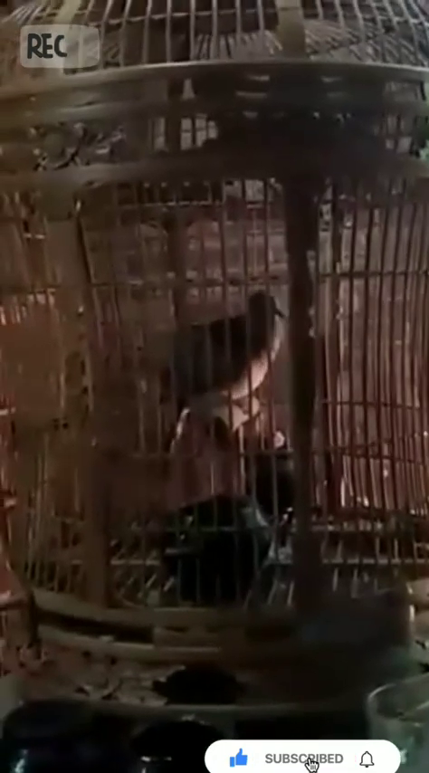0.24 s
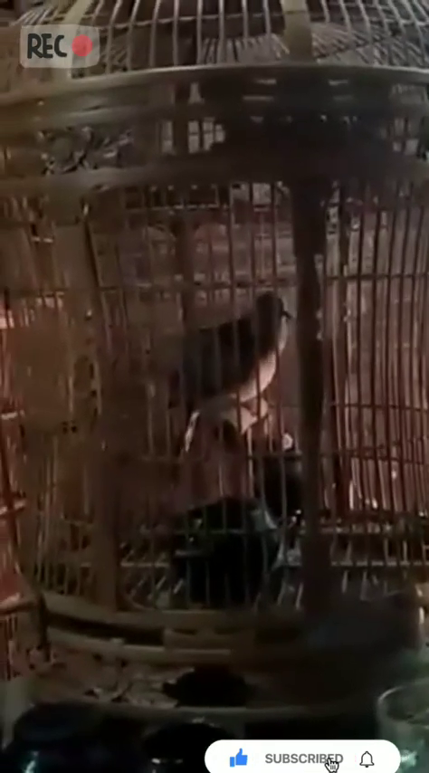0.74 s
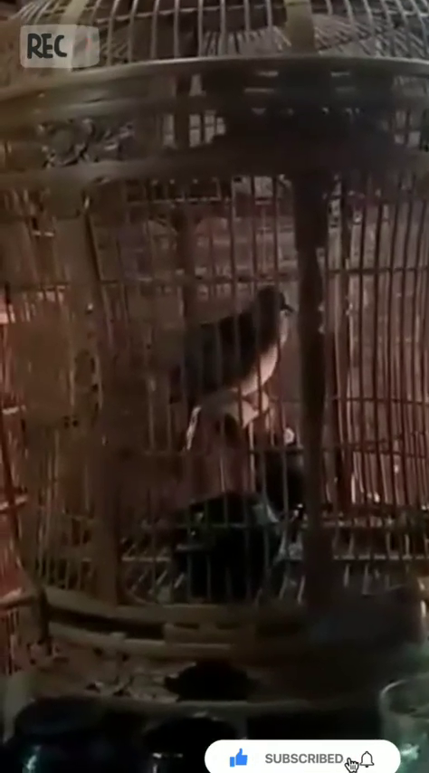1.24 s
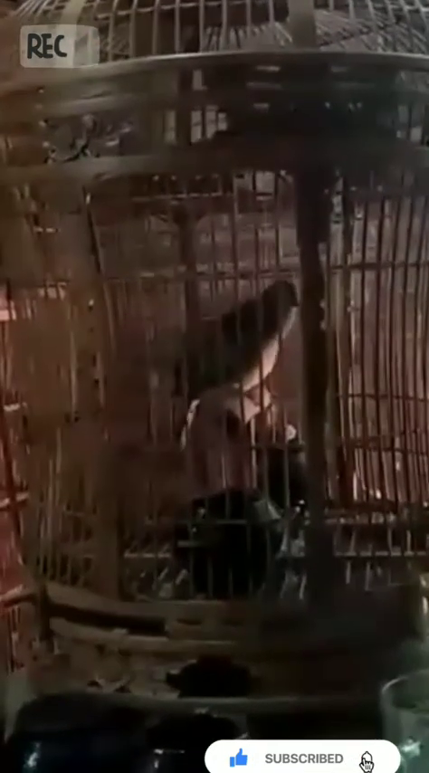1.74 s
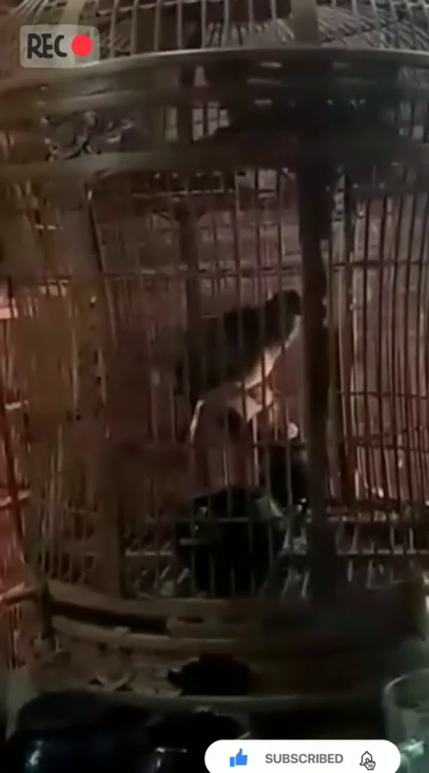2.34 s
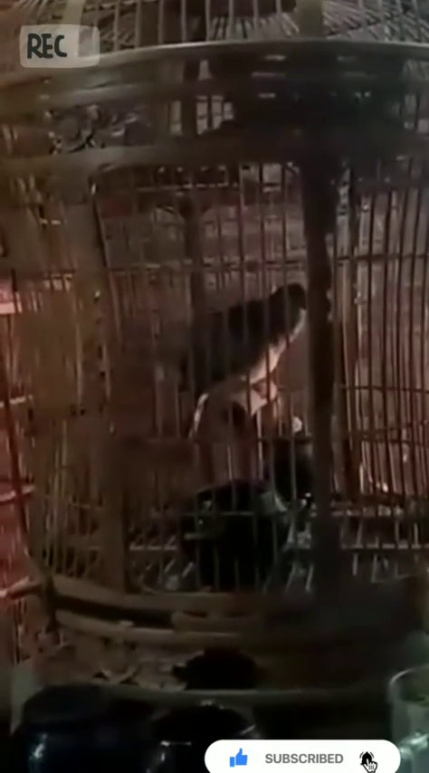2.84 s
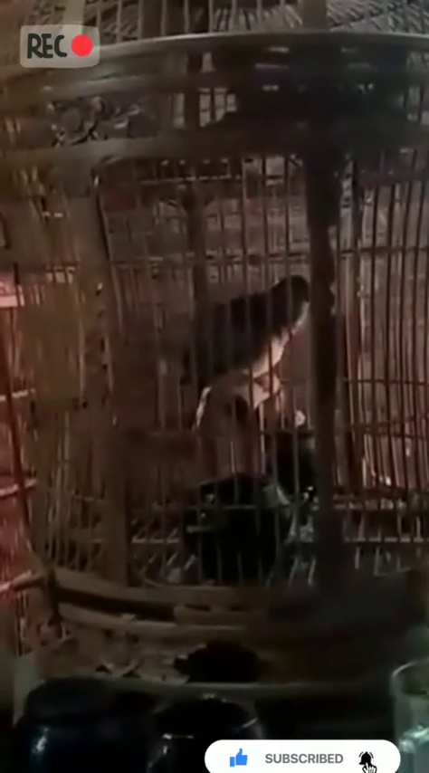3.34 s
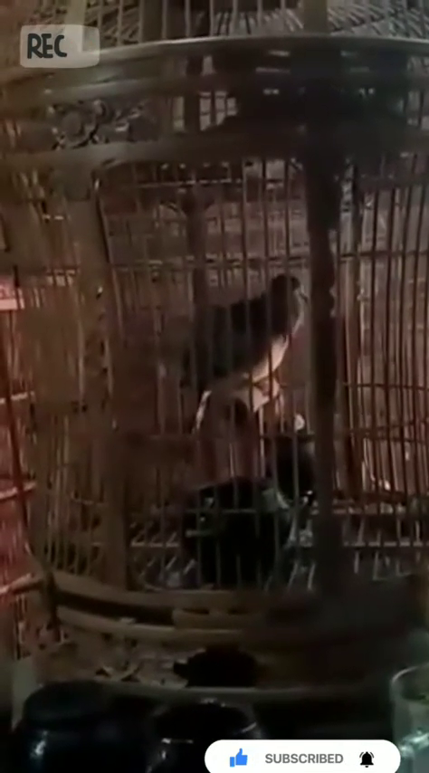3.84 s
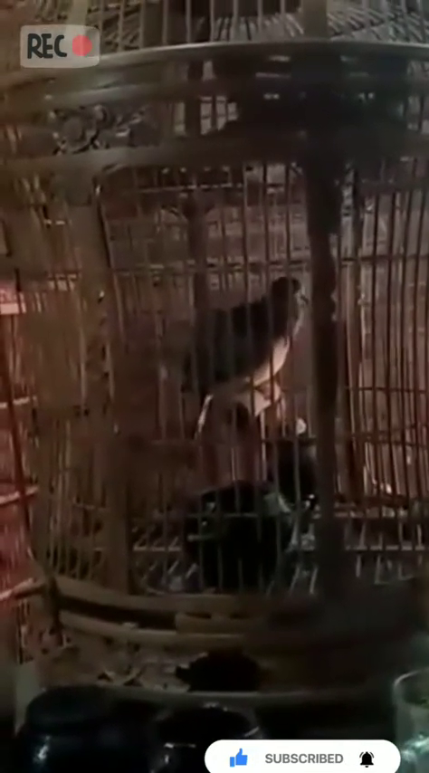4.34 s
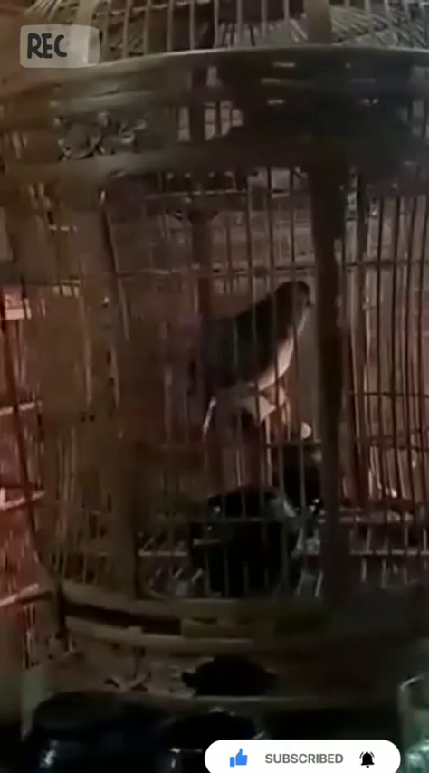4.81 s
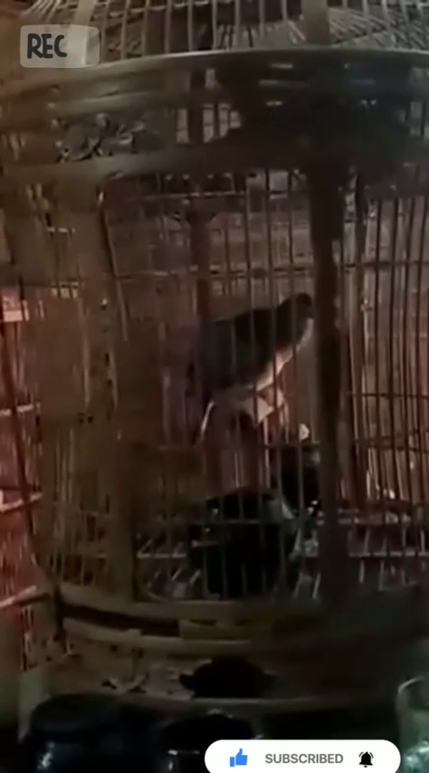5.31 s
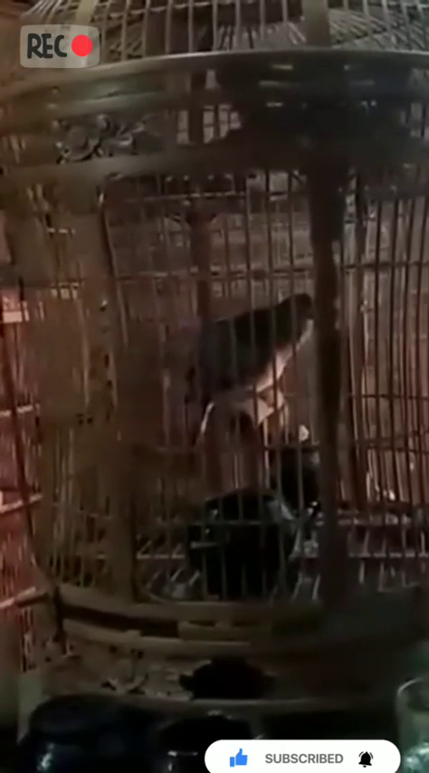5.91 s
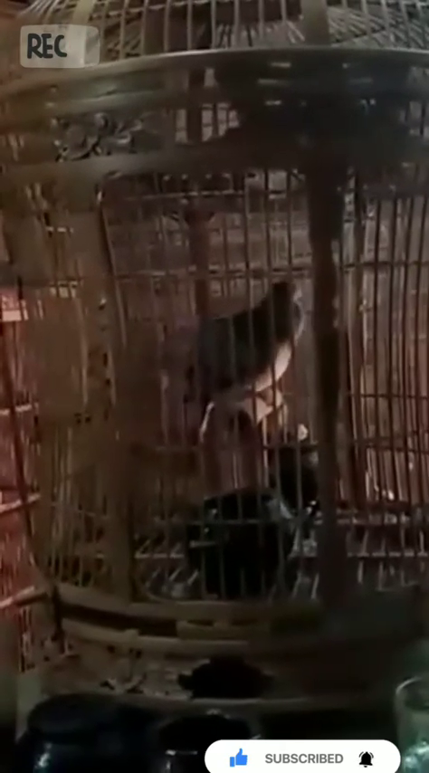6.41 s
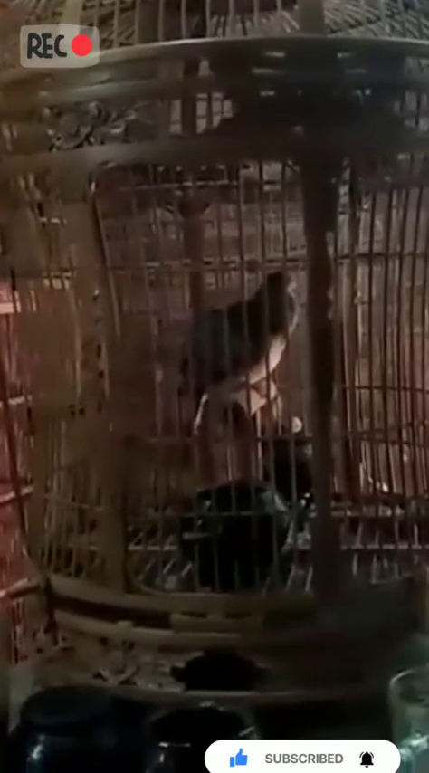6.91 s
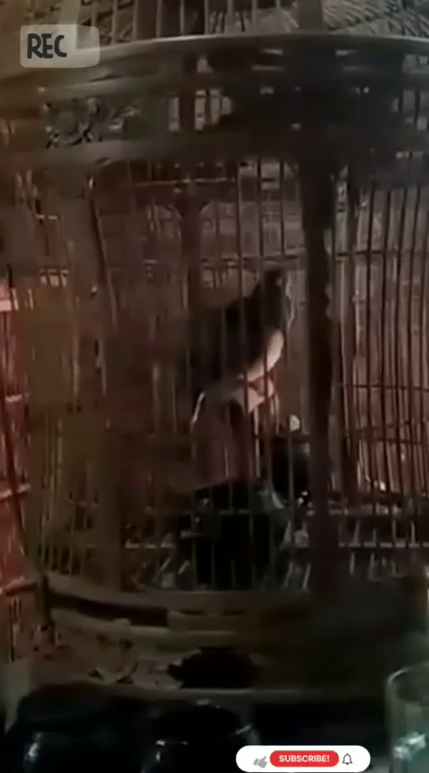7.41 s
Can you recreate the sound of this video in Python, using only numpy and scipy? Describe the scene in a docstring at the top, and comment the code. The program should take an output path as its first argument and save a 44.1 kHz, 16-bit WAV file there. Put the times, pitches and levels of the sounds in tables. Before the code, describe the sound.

Loud, flute-like staccato dove coos burst out twice in a reverberant yard, over softer replies, faint bird whistles and a distant low rumble.

```python
"""Doves in a hard-walled yard

A dove coos loudly, a second coos with it and two more further off: near-sines that scoop up in pitch.
A distant songbird drops quick gliding whistles and rasps of resonant noise, heard only as echoes.
Soft knocks are decaying sines; an engine idles far away as a firing tone over resonant rumble.
Behind them lie swelling traffic noise and a faint uneven hiss."""
import sys
import numpy as np
from scipy import signal
from scipy.fft import rfft, irfft
from scipy.io import wavfile
from scipy.ndimage import uniform_filter1d

SR = 44100
rng = np.random.default_rng(int(sys.argv[2]) if len(sys.argv) > 2 else 0)


def log_audio(samples):
    """Write samples as a 16-bit WAV file to the path given in sys.argv[1]."""
    # one column per channel
    frames = np.atleast_2d(samples).T
    # limit to full scale, then quantise
    limited = np.clip(frames, -1, 1)
    pcm = np.round(limited * 32767).astype(np.int16)
    wavfile.write(sys.argv[1], SR, pcm)


N = 337806
T = np.arange(N) / SR  # s


def undb(db):
    """Decibels are logarithmic: 20 dB is a factor of ten in amplitude."""
    return 10 ** (np.asarray(db) / 20)


def level(x, db):
    """Level is set by root mean square, the measure of average power."""
    return x * undb(db) / np.sqrt(np.mean(x ** 2))


def colour(table):
    """Spectral shaping: white noise weighted by (Hz, dB) points over log frequency, at rms 1."""
    hz, db = np.transpose(table)
    f = np.maximum(np.fft.rfftfreq(N, 1 / SR), 1)
    weight = undb(np.interp(np.log(f), np.log(hz), db, -120, -120))
    return level(irfft(rfft(rng.standard_normal(N)) * weight, N), 0)


def ring(x, modes):
    """Resonance: a sum of (Hz, width Hz, dB) modes, each filter applied twice for steeper skirts."""
    out = 0
    for hz, width, db in modes:
        b, a = signal.iirpeak(hz, hz / width, SR)
        once = signal.lfilter(b, a, x)
        out = out + undb(db) * signal.lfilter(b, a, once)
    return out


def walk(rate):
    """Slow random modulation: levels held 1 / rate s and smoothed twice; spread near 0.5."""
    k = int(SR / rate)
    steps = np.repeat(rng.standard_normal(N // k + 1), k)
    return 0.63 * uniform_filter1d(uniform_filter1d(steps, k), k)[:N]


def yard(x, t60, build, db):
    """Diffuse reverberation: dense echoes build up over build s and decay by 60 dB in t60 s."""
    t = T[:SR]
    echo = rng.standard_normal(SR) * (1 - np.exp(-t / build)) * np.exp(-np.log(1000) * t / t60)
    return undb(db) * signal.oaconvolve(x, echo / np.sqrt(np.sum(echo ** 2)))[:N]


def doves():
    """Direct and reverberant sound: singing away from the microphone favours the echo of the scoops."""
    # Each row: start in seconds, length in seconds, pitch after the attack in Hz, pitch at the release
    # in Hz, level after the attack in dB, change while held in dB, scoop before the start in seconds.
    near_notes = [(2.08, 0.082, 1302, 1305, -24, 4.5, 0.038), (2.178, .064, 1290, 1220, -25, 1, 0.0023),
                  (2.246, 0.041, 1249, 1225, -19.5, 0.5, .012), (2.338, 0.036, 1237, 1219, -19, 0.5, .014),
                  (2.466, 0.046, 1242, 1260, -18.5, -6.5, .014), (2.605, 0.034, 1236, 1259, -24.5, 4, .016),
                  (2.648, 0.071, 1268, 1235, -24, -0.5, 0.00039),
                  (2.704, 0.019, 1229, 1215, -19, 1, 0.0066), (5.264, 0.087, 1322, 1318, -22.5, 3, 0.034),
                  (5.365, 0.054, 1279, 1255, -24.5, -3.5, 0), (5.424, .04, 1260, 1222, -20.5, 2.5, .012),
                  (5.528, 0.025, 1229, 1212, -20, 1.5, .012), (5.645, 0.037, 1244, 1232, -21, 2.5, .012),
                  (5.778, 0.029, 1244, 1265, -21, -1.5, .014), (5.816, 0.023, 1241, 1254, -21.5, -7.5, 0),
                  (5.845, 0.048, 1268, 1233, -30, 12.5, 0.0068)]
    second_notes = [(1.68, 0.19, 1168, 1138, -29.5, -6.5, 0.075),
                    (1.875, 0.058, 1152, 1173, -31, -0.5, 0.021),
                    (1.985, 0.047, 1160, 1143, -29.5, -4, 0.029),
                    (2.385, 0.088, 1142, 1183, -28, -3, 0.014), (2.89, 0.22, 1140, 1168, -33.5, 1, 0.037),
                    (3.17, .225, 1127, 1166, -35.5, 3.5, 0.04), (3.465, 0.22, 1142, 1169, -36, 4, .035),
                    (3.78, 0.21, 1141, 1168, -34.5, 0, .03), (4.085, 0.26, 1127, 1152, -37, -4.5, 0.022)]
    far_notes = [(.475, 0.22, 895, 930, -56, 3, 0.0045), (.685, 0.18, 905, 863, -53, -4.5, 0.012),
                 (.975, 0.13, 880, 863, -55, -4, 0.0051), (1.17, 0.096, 862, 882, -55, 2.5, 0.0094),
                 (1.39, 0.23, 872, 877, -54.5, 9.5, 0.0022), (5.99, .18, 1250, 1220, -50.5, 3, 0.0047),
                 (6.188, 0.086, 1225, 1206, -51, -17, 0.0069),
                 (6.355, 0.22, 1180, 1200, -57.5, 0.5, 0.0045),
                 (6.72, .23, 1205, 1234, -56.5, -8.5, 0.0073), (7.06, 0.15, 1190, 1156, -63.5, 1.5, 0.0043)]
    hum_notes = [(0.619, 0.32, 430, 460, -82, -5, 0), (5.0, 0.31, 440, 426, -79.5, 0.5, 0),
                 (5.45, .3, 430, 453, -79, 1, 0.0014)]  # a faint low tone, same columns
    # Each holds: attack as share of length, start in dB re its end, release as share of length,
    # end in dB re the release's start.
    near_shape = (0.6, -6, 0.38, -7)
    second_shape = (0.42, -10.5, 0.44, -18)
    far_shape = (0.14, -16, 0.27, -16)
    # Overtones. Each row: multiple of the pitch, relative level in dB.
    near_overtones = [(2, -45.5), (3, -53), (4, -58.5), (5, -51.5), (6, -45.5), (7, -44.5), (8, -66),
                      (9, -59), (10, -56.5), (11, -58.5)]
    second_overtones = [(2, -43), (3, -59)]
    # Air in the throat. Each row: frequency in Hz, relative density in dB per Hz.
    breath = [(2060, -45.5), (3500, -13), (3790, -14), (4320, -15), (5510, -16.5), (7610, -3.5), (9000, -7),
              (10400, -38.5), (11000, -6.5), (14100, -16), (15400, -31)]
    # Pitch region the walls return most. Each row: frequency in Hz, filter width in Hz, gain in dB.
    scoop_echo = [(1035, 300, 0)]

    near, stack, rise, effort = coos(near_notes, near_shape, 1.5, 0.55, scoop_db=-13.5,
                                     overtones=near_overtones, swell=2.92, octave_db=-44.5)
    top = undb(-3.5) * stack * (1 + 0.69 * walk(300.0))
    top += undb(-53.0) * effort * colour(breath)
    out = near + yard(near, 0.36, 0.025, -8)
    out += yard(ring(rise, scoop_echo), 0.6, 0.0016, 1.5)
    out += top + yard(top, 0.28, 0.0085, 0.048)

    second, top, rise, _ = coos(second_notes, second_shape, 3, 0.62, scoop_db=-9.5,
                                overtones=second_overtones, swell=6.53, octave_db=-24.5)
    out += second + yard(second, 0.7, 0.019, -11) + yard(rise, 0.73, 0.0019, -4.0)
    out += top + yard(top, 0.16, 0.0088, 0.67)

    far = coos(far_notes + hum_notes, far_shape, 4, 1, scoop_db=0,
               overtones=[], swell=0, octave_db=0)[0]
    return out + far + yard(far * (1 + 1.3 * walk(180)), 0.37, 0.055, -4.5)


def coos(notes, shape, waver_db, scoop_from, scoop_db, overtones, swell, octave_db):
    """Frequency modulation of a near-sine: returns tone, overtones, scoops alone and effort."""
    slur_s, edge = 0.006, 0.005  # s: shorter scoops are slurred over; fade at each end
    tone, stack, rise, effort = np.zeros((4, N))
    # each overtone comes and goes on its own
    patchy = [undb(db + 8 * walk(25)) for _, db in overtones]
    # the voice is never quite steady in level or pitch, and the rise into a note is hoarse
    flutter = undb(waver_db * walk(45.0))
    wobble = 1 + 0.003 * walk(40.0)
    hoarse = 0.5 * walk(500.0)
    for note in notes:
        s, hz, db = held(note, shape)
        scooped = note[-1] > slur_s
        scoop_s = note[-1] * scooped
        start = s[0] - scoop_s
        low = scoop_from if scooped else 1  # share of the held pitch
        soft_db = db.max() + scoop_db if scooped else db[0]
        span = slice(int((start - edge) * SR), int((s[-1] + edge) * SR))
        t = T[span]
        fade = np.sin(np.pi / 2 * np.clip(np.minimum(t - t[0], t[-1] - t) / edge, 0, 1)) ** 2
        contour_db = uniform_filter1d(np.interp(t, np.r_[start, s], np.r_[soft_db, db]), size=120)
        gain = np.sqrt(2) * fade * flutter[span] * undb(contour_db)
        # the rise is quick at first and eases into the note
        ease = np.clip((s[0] - t) / (scoop_s + edge), 0, 1) ** 1.9
        climb = 1 - (1 - low) * ease
        pitch = wobble[span] * uniform_filter1d(np.interp(t, s, hz), size=120) * climb
        phase = 2 * np.pi * np.cumsum(pitch) / SR
        # a small throat radiates low pitches poorly
        radiated = climb ** swell * (1 + hoarse[span] * np.sqrt(ease) * scooped)
        tone[span] += radiated * gain * np.sin(phase)
        harmonics = sum(p[span] * np.sin(k * phase) for (k, _), p in zip(overtones, patchy))
        stack[span] += radiated * gain * harmonics
        # the scoop alone ends where the held note starts
        scoop_gain = fade * undb(db.max()) * np.clip((s[0] - t) / edge, 0, 1) * scooped
        rise[span] += scoop_gain * (radiated * np.sin(phase) + undb(octave_db) * np.sin(2 * phase))
        effort[span] += gain
    return tone, stack, rise, effort


def held(row, shape):
    """Envelope and pitch arch: corners (s, Hz, dB) of attack, gliding hold and release."""
    s, length, from_hz, to_hz, db, change_db, _ = row
    attack, start_db, release, end_db = shape
    droop = 0.975  # pitch at both ends, as a share of the neighbouring corner
    times = s + length * np.array([0, attack, 1 - release, 1])
    pitches = np.array([droop * from_hz, from_hz, to_hz, droop * to_hz])
    levels = db + np.array([start_db, 0, change_db, change_db + end_db])
    return times, pitches, levels


def songbird():
    """Indirect sound: hoarse gliding whistles with a thin hiss, and rasps, come only by the walls."""
    # Each row: start in seconds, length in seconds, from pitch in Hz, to pitch in Hz,
    # peak level before the echoes in dB.
    whistles = [(-.02, 0.046, 2990, 1972, -53), (-.02, 0.07, 1380, 940, -63.5),
                (0.043, 0.068, 2400, 2970, -68.5), (0.22, 0.19, 790, 787, -82.5),
                (0.719, 0.042, 1235, 1236, -66), (0.912, 0.066, 2494, 1194, -47.5),
                (1.042, 0.11, 2310, 3026, -58.5), (1.189, 0.081, 2670, 2010, -59),
                (1.546, 0.037, 2007, 1032, -43), (1.65, 0.046, 2057, 2475, -61.5),
                (1.868, 0.056, 1690, 2153, -43), (1.936, 0.04, 2276, 1210, -43.5),
                (2.261, .08, 3232, 2104, -54.5), (3.078, 0.15, 7200, 7080, -75.5),
                (3.376, 0.042, 1436, 2677, -47.5), (3.42, 0.043, 2263, 1490, -42.5),
                (3.645, 0.09, 3013, 2430, -63.5), (4.024, 0.087, 1940, 2240, -58.5),
                (4.314, 0.084, 2480, 1227, -46.5), (4.535, 0.088, 6130, 6150, -70),
                (4.752, 0.042, 2420, 1843, -62), (4.837, 0.083, 903, 1060, -68),
                (4.852, 0.17, 1539, 1374, -61.5), (4.872, 0.14, 5000, 4310, -70.5),
                (4.916, 0.079, 2340, 3336, -56), (5.041, 0.11, 3260, 2277, -61),
                (5.098, 0.077, 1600, 1800, -60), (5.154, 0.063, 962, 1070, -51.5),
                (5.858, .1, 2854, 1424, -44.5), (6.116, 0.1, 2826, 2760, -65.5),
                (6.577, 0.028, 1995, 1890, -76), (6.611, 0.039, 5850, 5660, -70),
                (7.556, 0.05, 868, 920, -68.5)]
    # Each row: start in seconds, length in seconds, level before the echoes in dB, treble over body in dB.
    rasps = [(-.06, 0.29, -75.5, -0.5), (1.086, 0.21, -64.5, -5.5), (1.688, 0.097, -77, -4),
             (1.936, 0.093, -79, 10), (2.783, 0.067, -78, 9.5), (4.403, 0.031, -82, 5),
             (4.909, 0.27, -61.5, -5), (5.154, 0.025, -74.5, 9), (6.566, 0.13, -82.5, 8.5),
             (6.979, 0.064, -91, 9)]
    # Resonances of the rasp. Each row: frequency in Hz, filter width in Hz, relative level in dB.
    body_modes = [(1110, 1300, -10.5), (2060, 4000, 9.5)]
    treble_modes = [(6820, 800, 2), (8840, 7500, 10)]
    # Each row: frequency in Hz, relative density in dB per Hz.
    hiss_points = [(6000, -26.5), (7200, -9.5), (8200, -4), (9600, -1.5), (10300, -6), (11200, -18),
                   (14500, -23.5)]

    low, high, rustle = np.zeros((3, N))
    body = level(ring(rng.standard_normal(N), body_modes), 0)
    body = signal.sosfilt(signal.butter(6, 3200, fs=SR, output="sos"), body)
    treble = level(ring(rng.standard_normal(N), treble_modes), 0)
    hiss = colour(hiss_points)
    hoarse = 1 + 0.5 * walk(300)
    waver = 1 + 0.04 * walk(120)
    for s, length, from_hz, to_hz, db in whistles:
        span = slice(max(int(s * SR), 0), int((s + length) * SR))
        u = np.clip((T[span] - s) / length, 0, 1)
        glide = to_hz + (from_hz - to_hz) * (1 - u) ** 1.3
        phase = 2 * np.pi * np.cumsum(waver[span] * glide) / SR
        gain = undb(db) * np.abs(np.sin(np.pi * u)) ** 0.54
        low[span] += gain * hoarse[span] * np.sin(phase)
        high[span] += gain * undb(-25) * hiss[span]
    for s, length, db, treble_db in rasps:
        gain = undb(db) * np.sin(np.pi * np.clip((T - s) / length, 0, 1))
        low += gain * body
        rustle += gain * undb(treble_db) * treble
    near_walls = yard(low, 0.15, 0.008, -4)
    # the slow-building tail of whistles and rasp body loses its treble on the way round
    dull = signal.sosfiltfilt(signal.butter(4, 3800, fs=SR, output="sos"), low)
    grain = undb(3.7 * walk(70.0))  # separate echoes make the tails grainy
    out = grain * (near_walls + yard(dull, 0.48, 0.44, 3))
    return out + yard(high, 0.98, 0.014, 0) + yard(rustle, 0.051, 0.0045, 0)


def thuds():
    """Damped free vibration: each soft knock is one low mode decaying exponentially."""
    # Each row: start in seconds, mode in Hz, level before attack and echo in dB, 60 dB decay in seconds.
    knocks = [(.14, 290, -67, .12), (1.74, 262, -59, .22), (1.77, 400, -68, .15), (5.64, 305, -70, .3)]
    out = np.zeros(N)
    for s, hz, db, t60 in knocks:
        t = np.maximum(T - s, 0)
        attack = np.minimum(t / 0.02, 1)
        out += undb(db - 60 * t / t60) * attack * np.sin(2 * np.pi * hz * t)
    return out + yard(out, 0.3, 0.0091, 2.5)


def engine():
    """Periodic firing and resonant noise: a wavering low tone emerges from rumble as the level grows."""
    # Each row: time in seconds, level in dB.
    levels = [(0.0, -85), (0.08, -65), (1.09, -79.5), (1.21, -66.5), (2.09, -85.5), (2.37, -65),
              (2.98, -74.5), (3.39, -67.5), (3.46, -55), (4.65, -57.5), (4.82, -66), (5.89, -66),
              (6.34, -86.5), (6.42, -57.5), (6.76, -52.5), (7.02, -63.5), (7.34, -53), (7.66, -55)]
    firing_hz = 59.7
    tone_from_db, tone_full_db = -72, -52.5  # levels where the tone emerges and takes over
    db = np.interp(T, *np.transpose(levels))
    share = np.clip((db - tone_from_db) / (tone_full_db - tone_from_db), 0, 1)
    phase = 2 * np.pi * np.cumsum(firing_hz * (1 + 0.015 * walk(1.3))) / SR
    firing = np.sin(phase) + undb(-18.5) * np.sin(2 * phase)
    tone = level(undb(0.99 * walk(7.8)) * firing, 0)
    rough = ring(rng.standard_normal(N), [(54.4, 47, 8.0), (127, 36, -13.5)])
    rumble = level(undb(1.0 * walk(4.2)) * rough, 0)
    return undb(db) * (np.sqrt(share) * tone + np.sqrt(1 - share) * rumble)


def traffic():
    """Amplitude-modulated noise: a low broadband sound swells and fades."""
    # Each row: frequency in Hz, relative density in dB per Hz.
    spectrum = [(53, -29.5), (90, 0), (149, -2.5), (222, -20.5), (289, -10), (364, -16), (815, -14),
                (1170, -16), (1600, -20.5), (2080, -53), (3520, -120)]
    # Each row: time in seconds, level in dB, about which it wavers.
    swells = [(0.0, -80.5), (0.79, -77), (3.16, -74.5), (4.03, -77), (4.99, -82), (5.87, -71), (6.27, -75),
              (6.72, -72.5), (7.25, -76.5), (7.66, -76.5)]
    return colour(spectrum) * undb(np.interp(T, *np.transpose(swells)) + 2 * walk(4.6))


def air():
    """Random noise with a fluctuating envelope: a faint uneven hiss."""
    # Each row: frequency in Hz, relative density in dB per Hz.
    spectrum = [(530, -32.5), (900, -7), (1180, -5.5), (1500, -9.5), (3140, -20.5), (8630, -22),
                (10400, -27), (12800, -22.5), (15400, -29.5)]
    return undb(-81.5 + 3.1 * walk(36.0)) * colour(spectrum)


def scene():
    """Superposition: the pressures of all sources add at one point."""
    return (doves() + songbird() + thuds() + engine() + traffic() + air())[None]


def record(dry):
    """Band limiting: the microphone dips in the treble and its top is cut."""
    # Each row: centre of the dip in Hz, width in Hz, gain at the centre in dB.
    dips = [(10440, 760, -10.5)]
    for hz, width, db in dips:
        dry = dry - (1 - undb(db)) * signal.lfilter(*signal.iirpeak(hz, hz / width, SR), dry)
    return signal.sosfilt(signal.ellip(8, 0.2, 70, 15600, fs=SR, output="sos"), dry)


dry = scene()
out = record(dry)
log_audio(out)
```